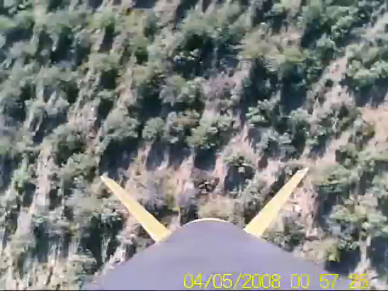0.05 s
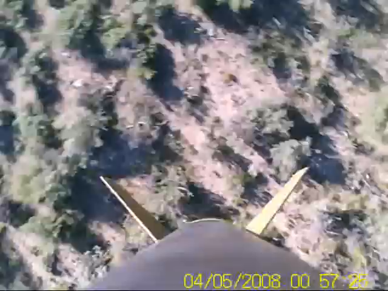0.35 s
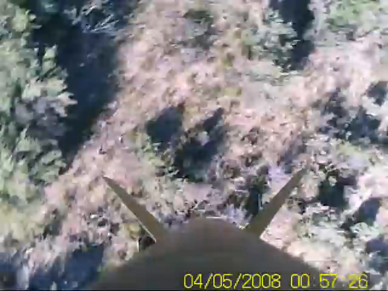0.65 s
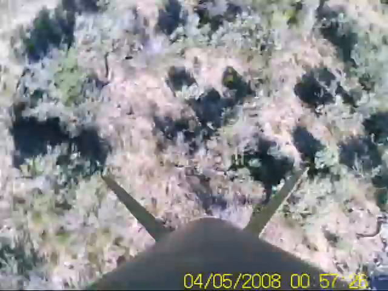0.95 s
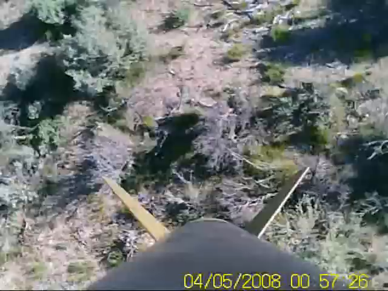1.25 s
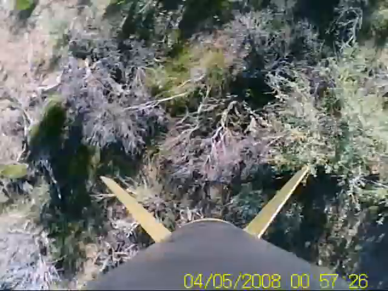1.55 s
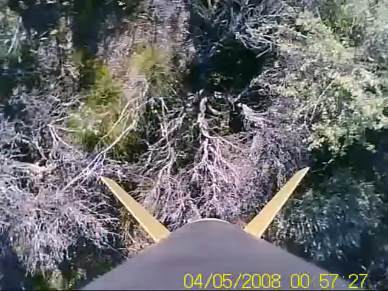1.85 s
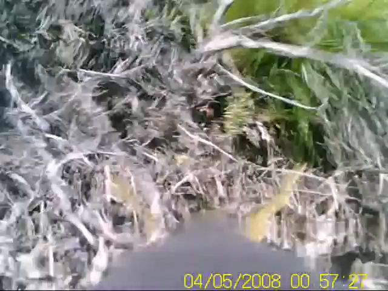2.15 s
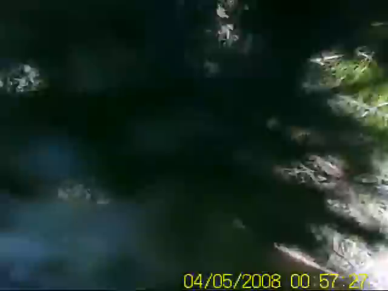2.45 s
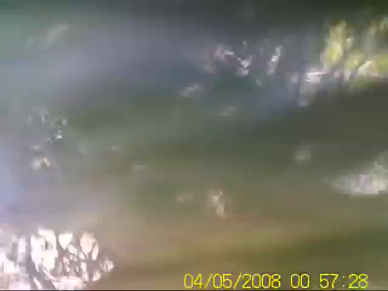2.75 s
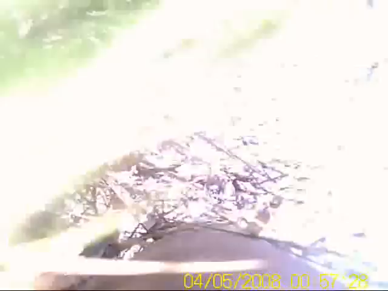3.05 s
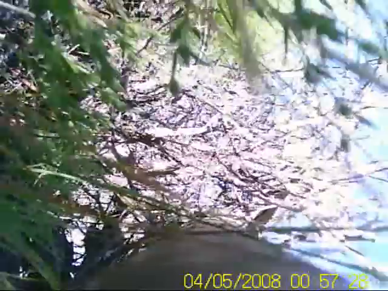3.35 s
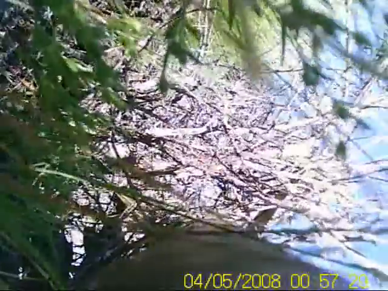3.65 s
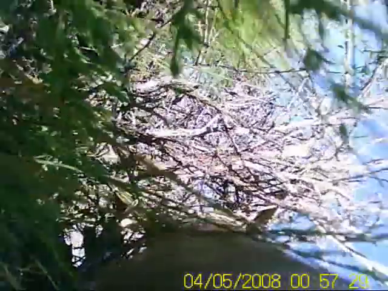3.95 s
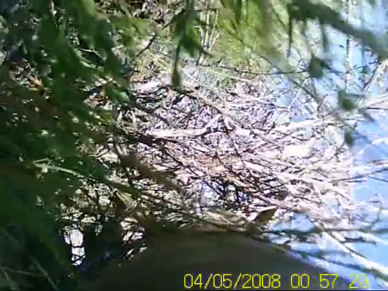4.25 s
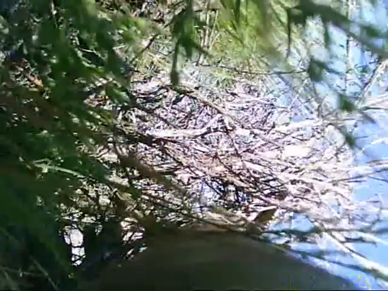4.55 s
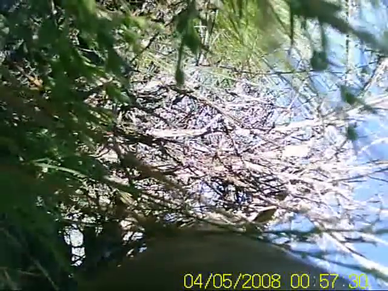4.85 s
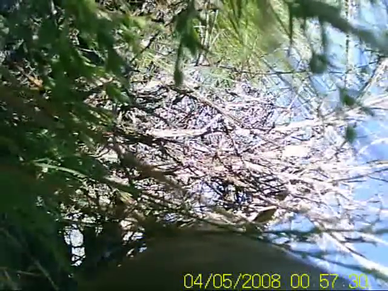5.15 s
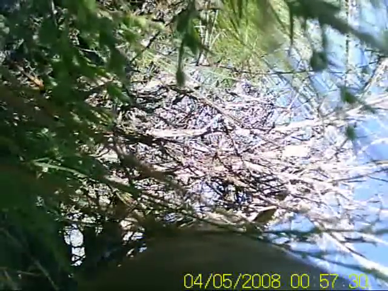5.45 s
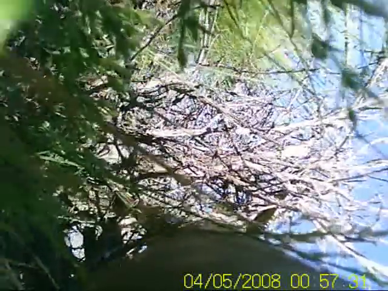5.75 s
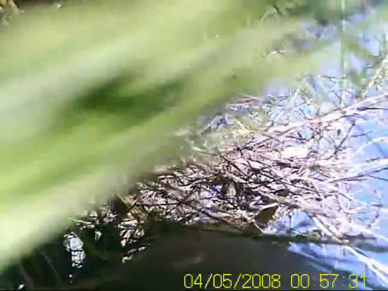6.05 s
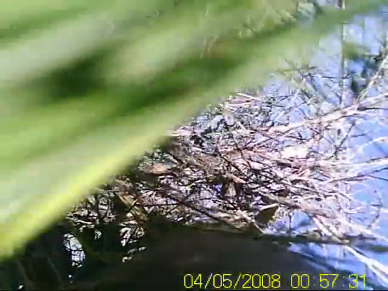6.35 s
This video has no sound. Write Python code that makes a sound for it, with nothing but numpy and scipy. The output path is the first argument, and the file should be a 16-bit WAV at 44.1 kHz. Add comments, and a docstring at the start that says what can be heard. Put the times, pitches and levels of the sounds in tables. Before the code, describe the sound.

Gusts rush past a small falling rocket until it cracks through branches, slides through needles and hangs there, softly brushed by twigs.

```python
"""Wind thumps on a microphone and whistles past a hull: a camera is falling on a small rocket.
The rocket crashes into a tree. Branches scrape and snap against its hollow tube, which rings,
and the crash overloads the microphone. The rocket slides through needles, stops and hangs there,
brushed now and then as a breeze sways the twigs. The camera hisses faintly throughout."""
import sys
import numpy as np
from scipy import signal
from scipy.fft import rfft, irfft
from scipy.io import wavfile

SR = 44100
rng = np.random.default_rng(int(sys.argv[2]) if len(sys.argv) > 2 else 0)


def bounce(signal):
    """Save signal as a 16-bit WAV file at the path given by the first command-line argument."""
    frames = np.transpose(np.atleast_2d(signal))
    limited = np.clip(frames, -1, 1)
    pcm = np.round(limited * 32767).astype(np.int16)
    wavfile.write(sys.argv[1], SR, pcm)


N = 291060

# Tone colours: how deep or bright each sound is. Each row: frequency in Hz, relative level in dB.
BUFFET_TONE = [(12, -1.5), (35, 5.5), (100, -3), (280, -12), (500, -25.5), (2000, -74.5)]
RUSH_TONE = [(80, -9.5), (280, 5), (1000, -5), (1650, -10.5), (2400, -25), (4000, -33), (5000, -44),
             (16000, -62.5)]
TEAR_TONE = [(400, -19), (1500, 10.5), (4200, -6.5), (5500, -15.5), (16000, -39)]
CAMERA_TONE = [(30, 23.5), (200, 9.5), (700, 4.5), (15500, -3.5)]
HISS_TONE = [(600, -24), (1500, 28), (3500, 32), (4800, 14.5), (6200, 27.5), (8000, 11.5), (15500, 11)]
CRACK_TONE = [(400, -19), (1800, 4.5), (6000, 0.5), (9000, -6.5), (15000, -9.5)]
BARK_TONE = [(60, -17.5), (250, -2), (700, -8), (1300, -1), (2200, 1), (2700, -4), (6500, -13), (9000, -22),
             (15500, -27)]
THUD_TONE = [(100, -17.5), (250, 0.5), (370, -7.5), (1000, -6), (5000, -35.5)]
NEEDLE_TONE = [(100, -25), (200, -5), (330, -0.5), (800, -8.5), (1800, 1.5), (2750, -7), (3600, -2),
               (4700, -13), (6200, -9.5), (9000, -21), (15500, -20)]

# Gusts during the fall. Each row: start, end and fade time in seconds, buffeting in dB, rush in dB.
GUSTS = [(0.004, 0.015, 0.0063, -21.5, -28), (0.189, 0.2, 0.015, -26, -28),
         (0.22, 0.273, 0.0096, -26, -39.5), (0.544, 0.57, 0.09, -46, -35.5)]
# Big swirls of air push the microphone in and out once.
# Each row: start in seconds, length in seconds, level in dB.
SHOVES = [(0.014, 0.0096, -12.5), (0.093, 0.027, -17.5), (1.083, 0.0113, -1), (1.227, 0.0084, -4)]
# Sharp swirls slap the microphone. Each row: start in seconds, length in seconds, level in dB.
SWIRLS = [(0.173, 0.026, -32), (0.92, 0.051, -29.5), (0.981, 0.0047, -21), (1.073, 0.0079, -24.5),
          (1.102, 0.01, -22.5), (1.151, 0.0068, -20.5), (1.174, 0.011, -25), (1.215, 0.0095, -20.5),
          (1.404, 0.013, -26.5), (1.427, 0.022, -25), (1.497, 0.0049, -30), (1.657, 0.0085, -30.5)]
# The main blast, as the microphone turns into the airflow.
# Each row: time in seconds, relative buffeting level in dB, relative rush level in dB.
BLAST = [(0.68, -38, -65), (0.9, -33, -28.5), (0.957, -17.5, -21), (1.018, -16.5, -36),
         (1.076, -14.5, -26.5), (1.296, -21, -33.5), (1.544, -21.5, -35), (1.892, -33.5, -37),
         (2.08, -29, -53.5)]
# Puffs of breeze in the tree. Each row: peak time, rise time and fade time in seconds, level in dB.
PUFFS = [(3.76, 0.17, 0.14, -60), (5.56, 0.07, 0.26, -50.5)]
# The whine of the camera's electronics. Each row: pitch in Hz, level in dB.
WHINE = [(1200, -83), (3892, -82), (5599, -83), (7402, -87), (14700, -89)]
# Air grazes the edge of the housing. Each row: start in seconds, length in seconds, level in dB.
GRAZES = [(0.413, 0.08, -46.5), (0.477, 0.087, -52.5), (0.675, 0.07, -46), (1.142, 0.055, -52),
          (1.324, 0.11, -50.5)]
# Air hums in the housing's gaps. Each row: start and length in seconds, level in dB, pitch in Hz.
HUMS = [(0.5055, 0.05, -36, 670), (0.747, 0.081, -41, 1500), (0.688, 0.22, -57, 3630),
        (1.454, 0.42, -56, 3670), (2.2, 0.055, -35, 1200)]
# A brief whistle at an edge. Each row: time in seconds, pitch in Hz, relative level in dB.
WHISTLE = [(.69, 800, -110), (.718, 1250, -44), (.733, 2150, -42), (.742, 2450, -53), (.752, 2050, -44),
           (.768, 1850, -55), (.8, 1700, -110)]
# Twigs snap. Each row: start in seconds, relative level in dB, ring fade time in seconds, pitch in Hz.
SNAPS = [(2.084, -35, 0.008, 2940), (2.1186, 2, 0.0012, 1920), (2.1321, 0.5, 0.0077, 2270),
         (2.138, 10, 0.0055, 3440), (2.1454, 14, 0.0014, 2170), (2.477, -6, 0.0016, 2000),
         (2.487, -6, 0.0007, 2060), (2.4945, 4, 0.00034, 1710), (2.5397, -18, 0.00057, 4000),
         (2.662, -11, 0.0016, 2030), (2.701, -24.5, 0.0012, 3550), (2.7393, -18.5, 0.0012, 3460),
         (2.785, -21.5, 0.00087, 4300), (2.829, -19, 0.0012, 1750), (2.977, -30, 0.0018, 1500),
         (3.024, -18.5, 0.0012, 3850), (4.2, -50, 0.0019, 3424), (5.7042, -40, 0.0017, 1930),
         (6.0519, -39, 0.005, 1783)]
# Branches drag along the hull. Each row: start and length in seconds, relative level in dB,
# squeak pitch in Hz, squeak level in dB compared with its scrape.
SCRAPES = [(2.096, 0.047, -11.5, 1192, -4.5), (2.135, 0.011, 0, 3570, -14), (2.143, 0.032, -15, 1880, -1),
           (2.165, 0.025, -13, 1711, -9), (2.202, 0.022, -16.5, 2150, 5), (2.222, 0.061, -31, 1040, -5),
           (2.303, 0.02, -22.5, 1497, -6.5), (2.353, 0.024, -27.5, 6400, 2),
           (2.466, 0.046, -23.5, 1810, -17.5), (2.4907, 0.0042, -15.5, 1706, 10),
           (2.99, 0.11, -55.5, 6320, 18.5), (5.978, 0.011, -43.5, 1670, -10)]
# The tube bumps a thick branch. Each row: start and length in seconds, relative level in dB.
BUMPS = [(2.101, 0.088, -19), (2.17, .035, -26.5), (3.062, 0.017, -26.5)]
# Green twigs slip off the hull. Each row: start and length in seconds, relative level in dB, pitch in Hz.
SQUEAKS = [(2.795, 0.045, -41, 1770), (2.926, 0.0074, -27.5, 2050), (2.955, 0.008, -33, 3550),
           (2.97, 0.0066, -29.5, 3620), (2.98, 0.014, -35, 3550), (2.989, 0.016, -34, 1620),
           (3.012, 0.048, -34, 3650)]
# A sprig bends against the hull, rubs harder and harder, then slips off.
# Each row: touch time in seconds, slip time in seconds, relative level in dB.
BRUSHES = [(2.114, 2.185, -23), (2.31, 2.358, -40.5), (3.046, 3.062, -29), (3.284, 3.322, -52.5),
           (3.46, 3.504, -62), (3.903, 4.025, -58.5), (4.14, 4.204, -58.5), (4.634, 4.653, -67),
           (5.643, 5.717, -54.5), (5.752, 5.873, -53.5), (5.852, 5.956, -48), (6.074, 6.12, -63.5),
           (6.345, 6.415, -54.5), (6.496, 6.517, -63.5)]
# The slide down through the needles. Each row: time in seconds, relative level in dB.
SLIDE = [(2.25, -48.5), (2.272, -37), (2.33, -36.5), (2.41, -42), (2.68, -44.5), (2.83, -40), (3.0, -38),
         (3.09, -44.5), (3.42, -67.5)]
# The tube's own notes. Each row: pitch in Hz, seconds to fade by 60 dB, relative level in dB.
TUBE_NOTES = [(145, 0.66, -3), (243, 0.15, 5.5), (420, .25, -3), (530, 0.17, -5), (950, 0.1, -5),
              (1312, 0.06, -5), (3420, 0.019, 1)]
# One hard blow sets the tube booming. It lists start and length in seconds, then strength in dB.
KNOCK = (2.166, 0.002, -27)


def undb(db):
    """Turn decibels into a number to multiply by."""
    return 10 ** (np.asarray(db) / 20)


def unit(x):
    """Scale a signal so that its average power is 1."""
    return x / np.sqrt(np.mean(x ** 2) + 1e-18)


def curves(rows):
    """Join timed rows with straight lines, giving one curve for each column after the time."""
    times, *columns = np.transpose(rows)
    return [np.interp(np.arange(N) / SR, times, column) for column in columns]


def colour(x, tone):
    """Make a sound deeper or brighter, following a tone table."""
    size = 8192
    hz, db = np.transpose(tone)
    bin_hz = np.arange(size // 2 + 1) * SR / size
    gain = unit(undb(np.interp(np.log(bin_hz + 1), np.log(hz), db)))
    # These steps keep the filter from sounding before its input arrives.
    cepstrum = irfft(np.log(gain))
    cepstrum[1:size // 2] *= 2
    cepstrum[size // 2 + 1:] = 0
    response = irfft(np.exp(rfft(cepstrum)))
    return signal.fftconvolve(x, response)[:len(x)]


def ring(x, hz, t60):
    """Let a sound set one note ringing; the note fades by 60 dB in t60 seconds."""
    r = np.exp(-np.log(1000) / (t60 * SR))
    feedback = [1, -2 * r * np.cos(2 * np.pi * hz / SR), r * r]
    return np.sqrt((1 - r * r) / 2) * signal.lfilter([1, 0, -1], feedback, x)


def noise():
    """Plain, even hiss."""
    return rng.standard_normal(N)


def wobble(rate):
    """A curve that heads for a new random value rate times a second."""
    return unit(np.interp(np.arange(N) * rate / SR, np.arange(N), noise()))


def clicks(rate, spread_db):
    """About rate random clicks a second; the further spread_db is from 0, the more their sizes vary."""
    size, chance, sign = rng.exponential(size=N), rng.random(N), noise()
    hit, out = chance < rate / SR, np.zeros(N)
    out[hit] = undb(spread_db * np.minimum(size[hit], 5)) * np.sign(sign[hit])
    return unit(out)


def swell(start, length, db):
    """A push that grows and lets go."""
    out = np.zeros(N)
    live = np.arange(max(int(start * SR) + 1, 0), min(int((start + length) * SR), N))
    out[live] = undb(db) * np.sin(np.pi * (live / SR - start) / length)
    return out


def envelope(start, end, rise, fall):
    """Grow until start, hold until end, then fade. All four settings are in seconds."""
    t = np.arange(N) / SR
    return np.exp(np.minimum(t - start, 0) / rise - np.maximum(t - end, 0) / fall)


def airflow():
    """How strong the low buffeting and the higher rush are: a draught, gusts, the blast, then a breeze."""
    buffet_db, rush_db = curves(BLAST)
    blast = envelope(BLAST[0][0], BLAST[-1][0], rise=0.028, fall=0.13)  # fades as the tree stops the fall
    buffet = undb(-35) * envelope(0, 0.38, rise=0.11, fall=0.11) + blast * undb(buffet_db + 1.5)
    rush = undb(-53) * envelope(0.13, 0.38, rise=0.014, fall=0.11) + blast * undb(rush_db + 2.5)
    for start, end, fall, low_db, high_db in GUSTS:
        gust = envelope(start, end, rise=0.014, fall=fall)
        buffet += undb(low_db) * gust
        rush += undb(high_db) * gust
    breeze = undb(-76.5) + sum(undb(db) * envelope(peak, peak, rise, fall) for peak, rise, fall, db in PUFFS)
    return buffet + breeze, rush


def wind():
    """Slow swirls push on the microphone, fine ones rush by in spurts, and the sharpest ones tear."""
    t = np.arange(N) / SR
    buffet, rush = airflow()
    rumble = unit(colour(noise(), BUFFET_TONE)) * buffet
    for start, length, db in SHOVES:
        rumble += np.sin(2 * np.pi * (t - start) / length) * swell(start, length, db)
    spurts = unit(undb(4.5 * np.tanh(wobble(170))))
    swirls = sum(swell(*row) for row in SWIRLS)
    tearing = undb(-13.5) * colour(clicks(rate=2200, spread_db=3.5) * swirls, TEAR_TONE)
    rushing = colour(noise() * (rush * spurts + swirls), RUSH_TONE)
    return rumble + rushing + tearing


def electronics():
    """The camera's circuits hiss and whine steadily."""
    t = np.arange(N) / SR
    whine = sum(np.sqrt(2) * undb(db) * np.sin(2 * np.pi * hz * t) for hz, db in WHINE)
    return undb(-66) * unit(colour(noise(), CAMERA_TONE)) + whine


def edge_tones():
    """As the rocket turns, air grazes its edges and gaps: it hisses, hums and briefly whistles."""
    hiss = colour(noise(), HISS_TONE) * sum(swell(*row) for row in GRAZES)
    hums = sum(swell(start, length, db) * gap_hum(hz) for start, length, db, hz in HUMS)
    whistle_hz, whistle_db = curves(WHISTLE)
    flutter = 1 + 0.1 * wobble(1200)
    phase = 2 * np.pi * np.cumsum(whistle_hz * flutter) / SR
    whistle = undb(whistle_db + 4) * wobble(430) * np.sin(phase)
    return hiss + hums + whistle


def gap_hum(hz):
    """Swirling wind makes the air in a gap ring with a breathy note."""
    return unit(ring(ring(noise(), hz, t60=0.0026), hz, t60=0.0026))


def twigs():
    """In each snap, fibres tear and the twig itself rings for twice as long."""
    size = 4096
    t = np.arange(size) / SR
    tears, rings = np.zeros(N + size), np.zeros(N + size)
    for start, db, decay, hz in SNAPS:
        at = int(start * SR)
        fade = np.exp(-t / decay)
        tears[at:at + size] += undb(db) * fade ** 2 * rng.standard_normal(size)
        rings[at:at + size] += undb(db) * fade * np.sin(2 * np.pi * hz * t)
    return 0.74 * colour(tears[:N], CRACK_TONE) + 0.27 * rings[:N]


def branches():
    """Bark sticks and slips on the tube. Branches and green twigs squeak, and thick branches thud."""
    slips = clicks(rate=6500, spread_db=1.5)
    drag = np.zeros(N)
    squeaks = sum(swell(start, length, db) * squeak(hz, waver=0.0288) for start, length, db, hz in SQUEAKS)
    for start, length, db, hz, squeak_db in SCRAPES:
        push = swell(start, length, db)
        drag += slips * push
        squeaks += undb(squeak_db) * push * squeak(hz, waver=0.1)
    thuds = colour(noise() * sum(swell(*row) for row in BUMPS), THUD_TONE)
    return colour(drag, BARK_TONE) + squeaks + thuds


def squeak(hz, waver):
    """Tiny slips follow each other so evenly that they make an unsteady note."""
    pitch = hz * (1 + waver * wobble(700))
    return np.sqrt(2) * np.sin(2 * np.pi * np.cumsum(pitch) / SR)


def woody_ring(rubbing):
    """Rubbing wakes a crowd of close, quickly dying notes in the wood and the tube."""
    size, t60 = 4096, 0.042
    response = rng.standard_normal(size) * undb(-60 * np.arange(size) / SR / t60)
    return undb(-5.5) * signal.fftconvolve(rubbing, unit(response) / np.sqrt(size))[:N]


def needle_contact():
    """How hard the needles rub: one long slide, and single sprigs that bend and slip off."""
    t = np.arange(N) / SR
    slide_db, = curves(SLIDE)
    contact = undb(slide_db) * envelope(SLIDE[0][0], SLIDE[-1][0], rise=0.015, fall=0.13)
    for start, end, db in BRUSHES:
        pressure = np.interp(t, [start, end], undb([db - 9, db]))
        contact += pressure * envelope(start, end, rise=0.011, fall=0.029)
    return contact


def needles():
    """Needles flick past in uneven bunches, while dry tips tick and thin twigs ping."""
    contact = needle_contact() * undb(2.4 * wobble(90))
    brush = colour(clicks(rate=3000, spread_db=3) * contact, NEEDLE_TONE)
    ticks = colour(clicks(rate=33, spread_db=-0.5) * contact, CRACK_TONE)
    octaves = np.linspace(0, 1.6, num=12) + 0.05 * rng.standard_normal(12)
    pitches = 1300 * 2 ** octaves
    pings = sum(ring(clicks(rate=24, spread_db=2) * contact + 1e-18, hz, t60=0.017) for hz in pitches)
    return brush + undb(-10) * ticks + undb(-14) * pings


def hollow_tube(rustle):
    """The hard knock and the rustling needles make the tube ring at its own notes."""
    push = swell(*KNOCK) + undb(-36.5) * rustle
    return sum(undb(db) * ring(push + 1e-18, hz, t60) for hz, t60, db in TUBE_NOTES)


def scene():
    """Add up the fall, the crash and the rustle, all heard by one microphone."""
    rustle = needles()
    rubbing = undb(-0.5) * (branches() + rustle)
    air = wind() + edge_tones()
    tree = rubbing + woody_ring(rubbing) + twigs() + hollow_tube(rustle)
    return (air + tree + electronics())[None]


def record(dry):
    """The camera's signal sits slightly off zero; it loses its loudest peaks and its highest treble."""
    offset, top_hz = -0.0139, 15900
    clipped = np.clip(dry + offset, -1, 1) - offset
    treble_cut = signal.ellip(10, 0.1, 85, top_hz, fs=SR, output="sos")
    return signal.sosfilt(treble_cut, clipped) + offset


dry = scene()
out = record(dry)
bounce(out)
```